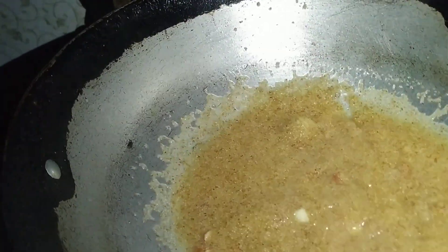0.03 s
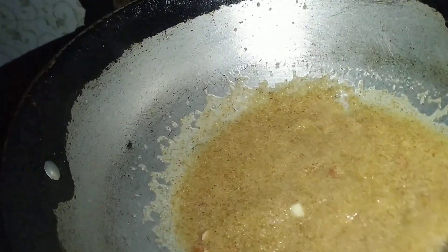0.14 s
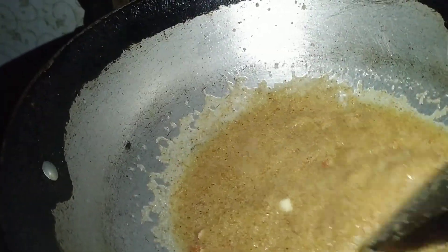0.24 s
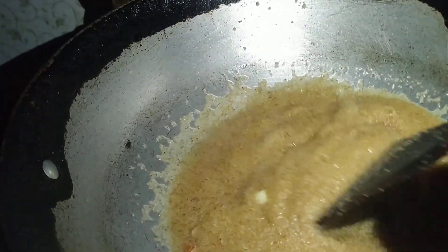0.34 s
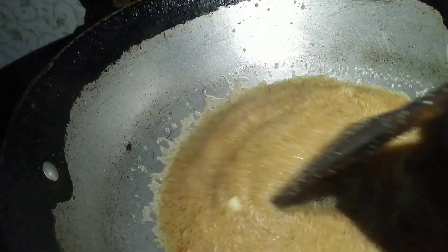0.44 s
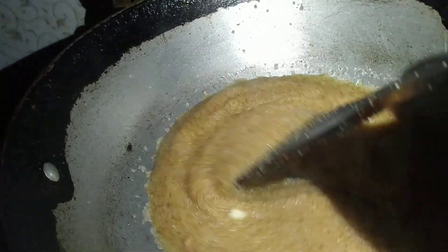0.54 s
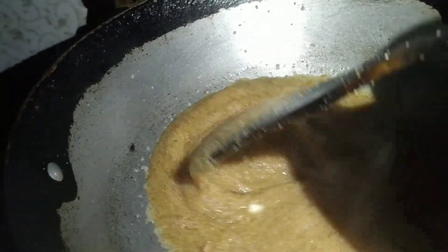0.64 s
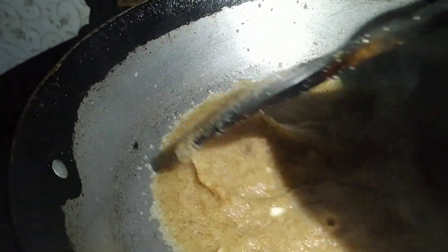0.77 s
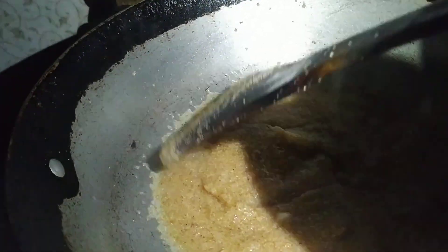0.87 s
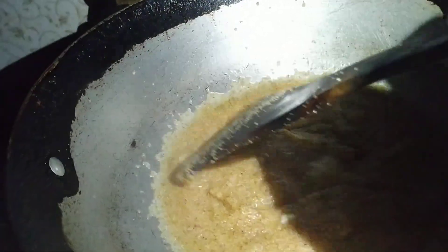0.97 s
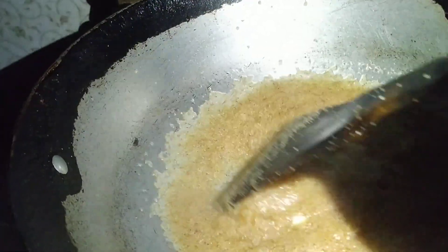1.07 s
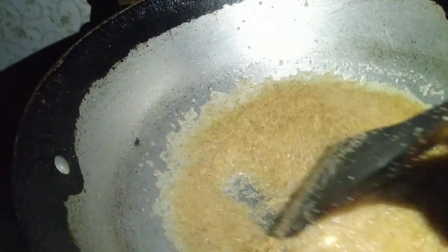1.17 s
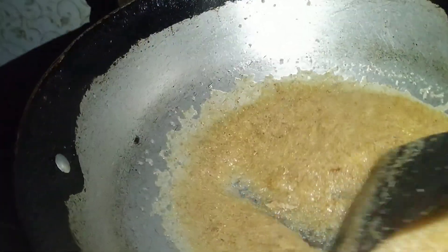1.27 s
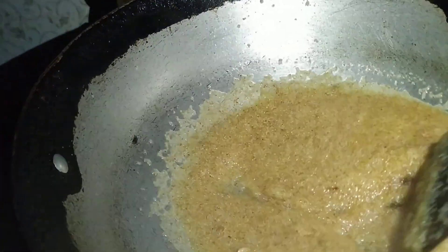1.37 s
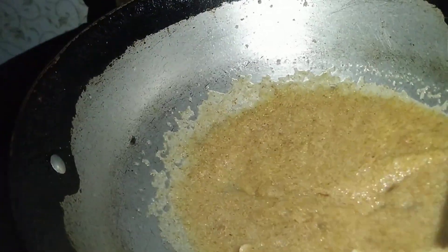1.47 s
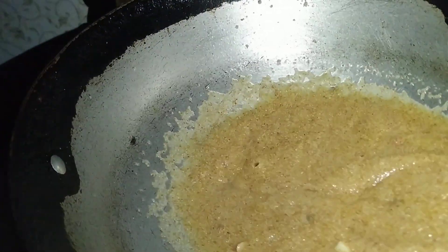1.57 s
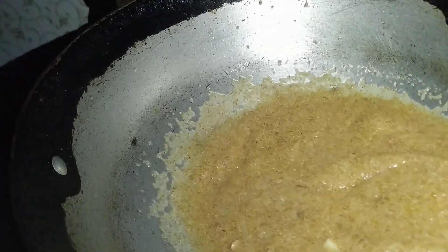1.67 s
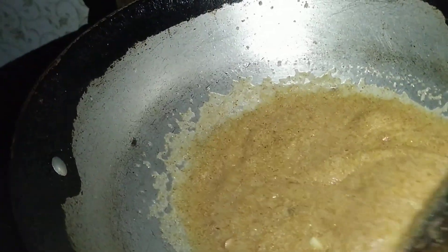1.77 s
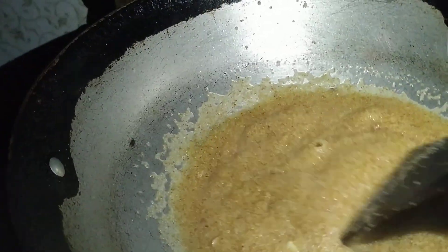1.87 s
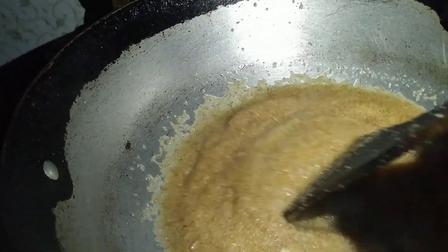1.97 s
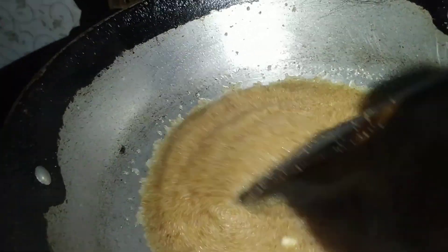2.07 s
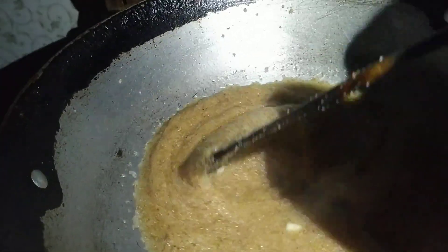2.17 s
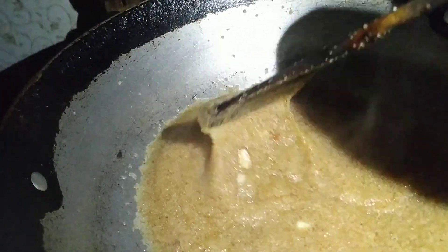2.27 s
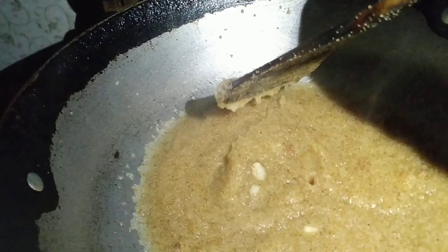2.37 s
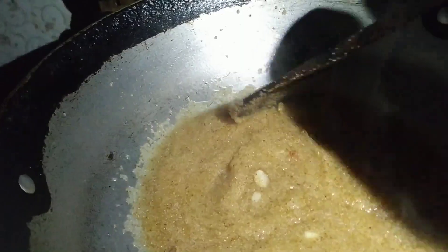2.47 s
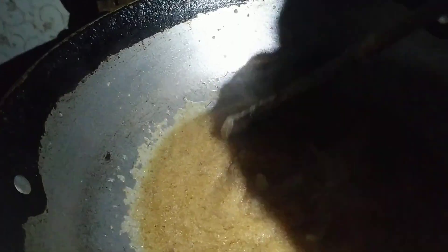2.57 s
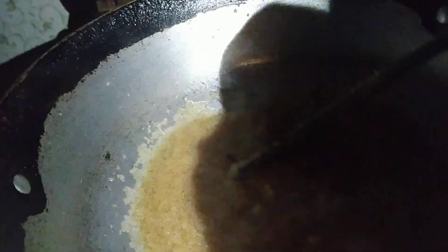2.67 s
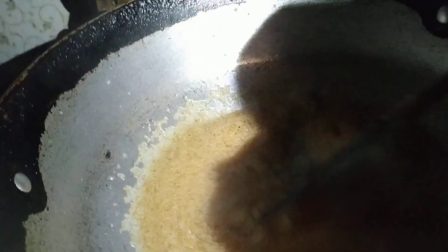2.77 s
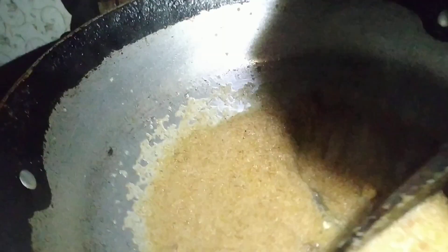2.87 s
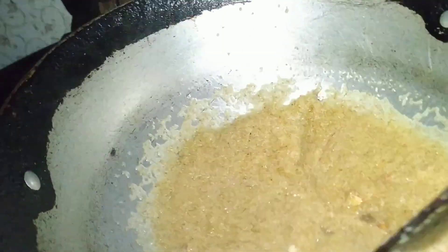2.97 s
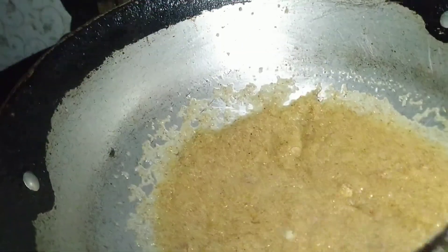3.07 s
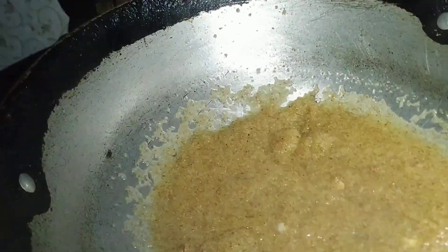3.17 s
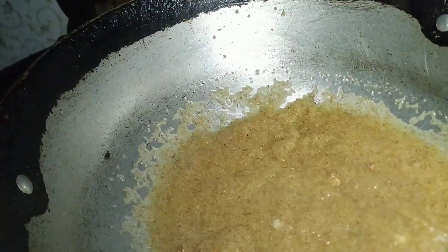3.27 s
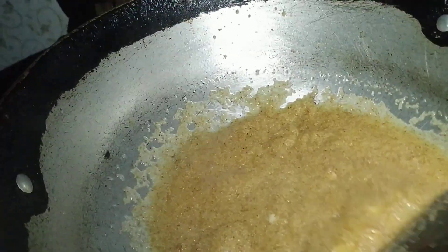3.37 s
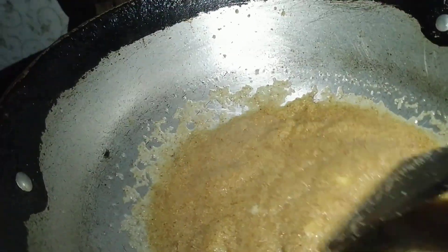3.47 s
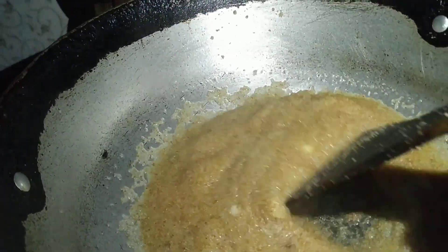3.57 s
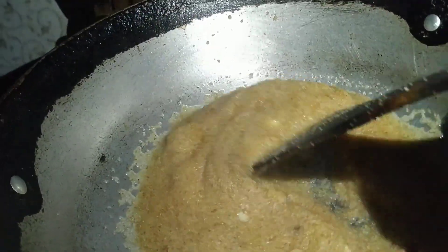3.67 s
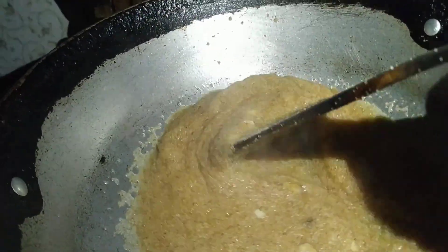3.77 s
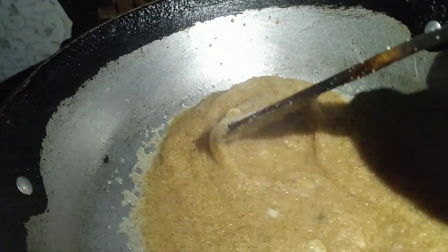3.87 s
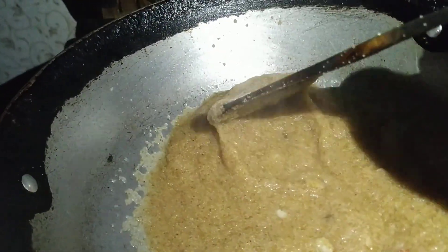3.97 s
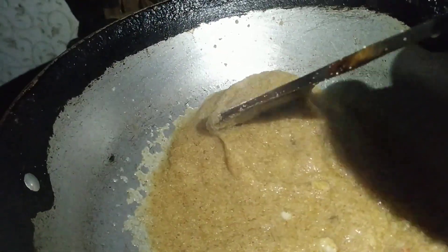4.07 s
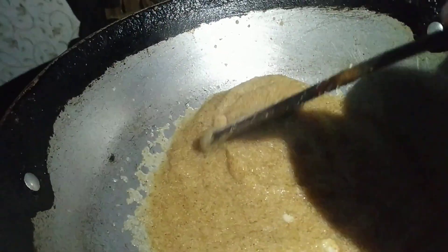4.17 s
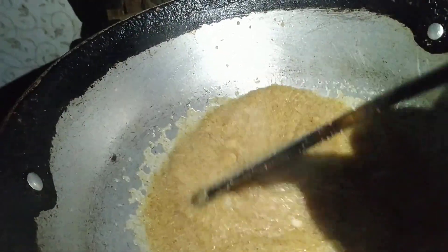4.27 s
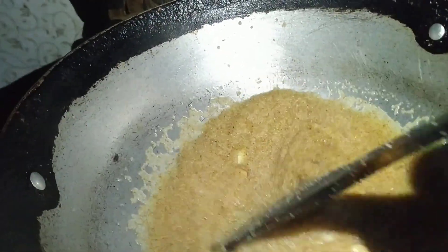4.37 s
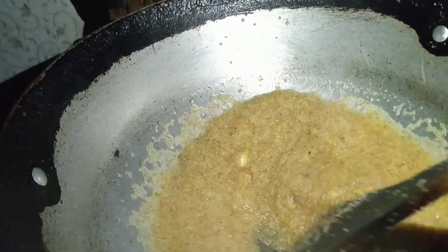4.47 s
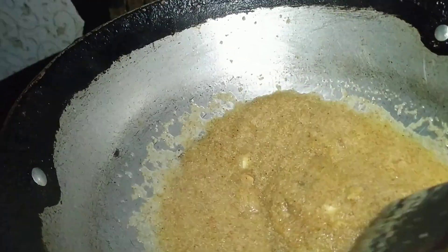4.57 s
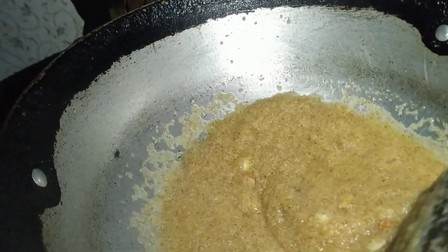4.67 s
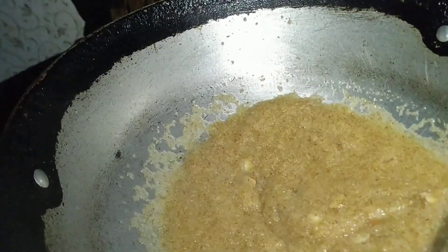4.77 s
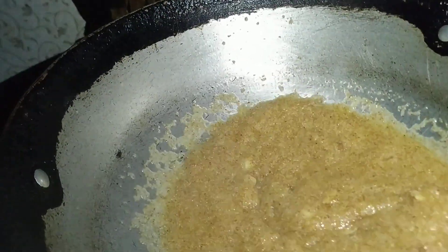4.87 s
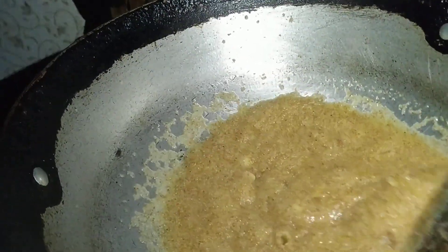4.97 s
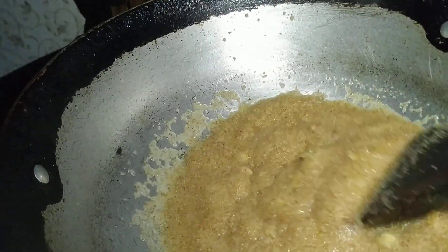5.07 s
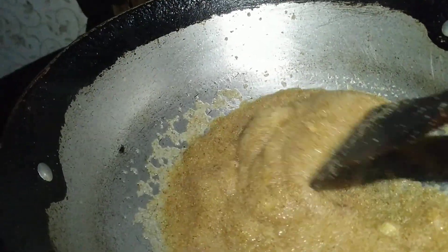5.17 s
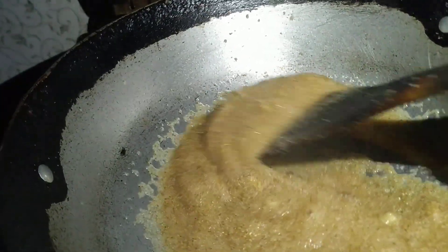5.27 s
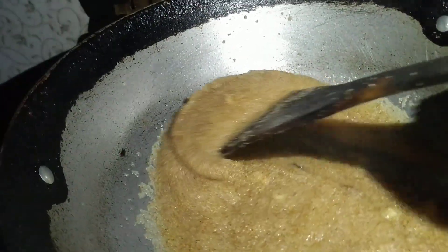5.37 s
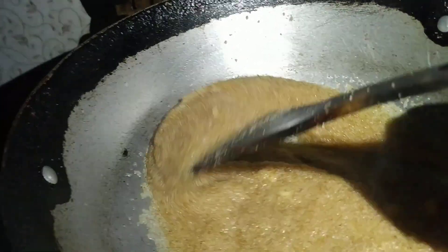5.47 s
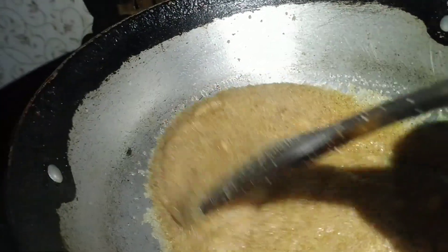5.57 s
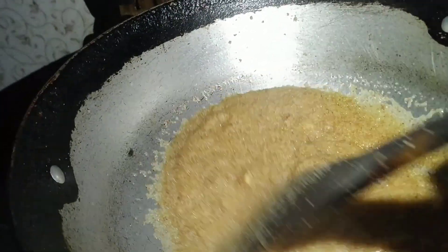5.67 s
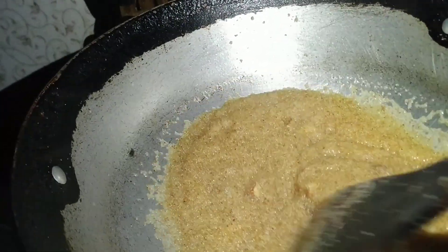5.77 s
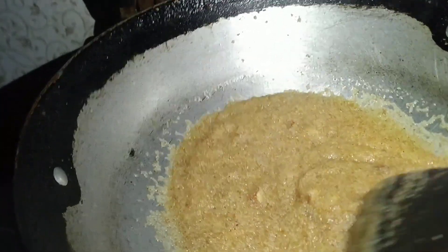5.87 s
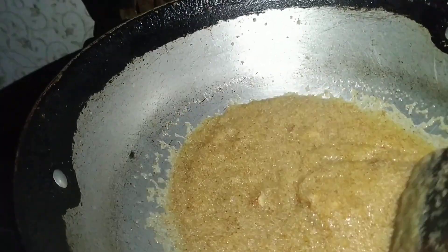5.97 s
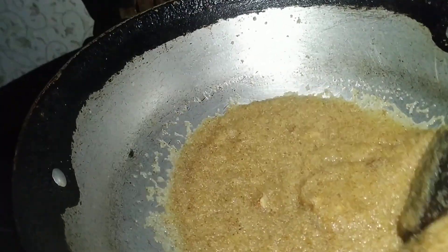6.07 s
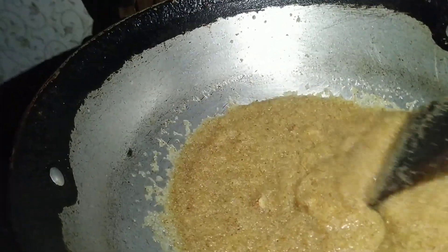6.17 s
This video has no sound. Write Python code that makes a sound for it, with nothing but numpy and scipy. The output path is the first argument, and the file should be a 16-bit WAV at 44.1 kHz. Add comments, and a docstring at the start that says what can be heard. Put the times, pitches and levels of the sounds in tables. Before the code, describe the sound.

Close-up stirring of thick pudding in a metal pan: muffled clonks, juddering scrapes, tiny wet spits, and a bump on the microphone midway.

```python
"""At a stove, a steel spatula stirs thick semolina pudding in a metal pan, close to a hand-held stereo
microphone. The blade knocks, judders, drags and rasps: clicks and grains drive the dull, short modes of the
loaded pan. The paste spits small ticks of filtered noise, bright cracks go with the bumps and a knock, a slow
motor throbs in low sines, and the hand sways and bumps the recorder. Its electronics add hiss and a buzz of
evenly spaced lines."""
import sys
import numpy as np
from scipy import signal
from scipy.io import wavfile
from scipy.ndimage import uniform_filter1d

SR = 44100
rng = np.random.default_rng(int(sys.argv[2]) if len(sys.argv) > 2 else 0)


def waveform_to_disk(signal):
    """Save audio, clipped to [-1, 1], as 16-bit WAV at the path in sys.argv[1]."""
    frames = np.transpose(np.atleast_2d(signal))
    scaled = np.clip(frames, -1, 1) * 32767
    samples = np.round(scaled).astype(np.int16)
    wavfile.write(sys.argv[1], SR, samples)


N = 274302

# how alike left and right are: (frequency [Hz], likeness [0 to 1])
LIKENESS = [(100, 0.77), (500, 0.97), (900, 0.25), (1300, 0.0), (16000, 0)]
# lean of the pan, positive to the left: (frequency [Hz], left-right difference [dB])
LEFT_LEAN = [(100, 5.5), (550, -2.5), (900, 3), (1800, 3.5), (3000, -1), (10000, 6)]
PLACES = 8   # spots on the pan, each with its own answer


def from_db(db):
    """Gain of a level in dB."""
    return 10 ** (np.asarray(db) / 20)


def rms_one(x):
    """Scale to unit rms."""
    return x / np.sqrt(np.mean(x ** 2) + 1e-20)


def filtered(x, order, hz, kind):
    """Butterworth filter."""
    return signal.sosfilt(signal.butter(order, hz, kind, fs=SR, output="sos"), x)


def in_time(rows):
    """Columns of a curve table at every sample."""
    s, *columns = np.transpose(rows)
    return [np.interp(np.arange(N) / SR, s, c) for c in columns]


def at_hz(points, hz):
    """Read a spectrum on a log-frequency axis."""
    points = np.array(points)
    return np.interp(np.log(hz), np.log(points[:, 0]), points[:, 1])


def lean(db):
    """Left and right gains for a left-right difference in dB."""
    return from_db(np.array([[db / 2], [-db / 2]]))


def drift(rate_hz):
    """Slow random wander of unit rms: noise smoothed by two poles at rate_hz, on every 40th sample."""
    r = np.exp(-80 * np.pi * rate_hz / SR)
    white = rng.standard_normal(N // 40 + 2002)
    slow = signal.lfilter([1], [1, -2 * r, r * r], white)[2000:]
    return np.interp(np.arange(N) / 40, np.arange(len(slow)), rms_one(slow))


def evened(x, seconds):
    """Hold the short-time level near 1."""
    power = uniform_filter1d(x ** 2, round(seconds * SR))
    return x / np.sqrt(power + 0.45 * np.mean(x ** 2))


def ring(x, hz, t60, phase=0):
    """A unit click sets a decaying sine of height 1 ringing from the given phase."""
    r, w = from_db(-60 / (t60 * SR)), 2 * np.pi * hz / SR
    start = [np.sin(phase), r * np.sin(w - phase)]
    return signal.lfilter(start, [1, -2 * r * np.cos(w), r * r], x + 1e-18)


def grains(per_s, spread_db):
    """Random clicks of uneven size and either sign; unit rms."""
    sizes = from_db(spread_db * np.minimum(rng.exponential(1, N), 3.5)) * rng.choice([-1, 1], N)
    return rms_one(sizes * (rng.random(N) < per_s / SR))


def coloured(x, low_db, upper_db, top_db):
    """Split into four ranges that sum to x, and weigh three of them against the middle."""
    # borders between low, middle, upper and top: ([Hz])
    range_edges_hz = [450, 1050, 2200]
    under = [filtered(x, 2, hz, "low") for hz in range_edges_hz]
    low, middle, upper, top = under[0], under[1] - under[0], under[2] - under[1], x - under[2]
    return from_db(low_db) * low + middle + from_db(upper_db) * upper + from_db(top_db) * top


def stereo_bands(size, spectrum, leaning, shape):
    """Third-octave bands of stereo noise, each with its level, likeness, lean and shape(hz) in time."""
    out, edges = 0, 56 * 2 ** (np.arange(26) / 3)
    white = rng.standard_normal((2, 2, size + SR // 10))   # with a run-in; neighbouring bands use different noise
    for k, (low, high) in enumerate(zip(edges, edges[1:])):
        mid, side = filtered(white[k % 2], 2, [low, high], "band")[:, -size:]
        hz = np.sqrt(low * high)
        alike = np.clip(at_hz(LIKENESS, hz), -1, 1)
        pair = np.sqrt(1 + alike) * mid + np.sqrt(1 - alike) * side * [[1], [-1]]
        out = out + from_db(at_hz(spectrum, hz)) * lean(at_hz(leaning, hz)) * shape(hz) * pair
    return out


def floor():
    """Room and circuit hiss: noise bands whose levels waver separately."""
    # relative colour of the hiss: (frequency [Hz], density [dB per Hz])
    hiss_spectrum = [(35, -30), (60, 7.5), (192, -13.5), (299, -0.5), (466, -16), (692, -8), (1560, -18),
                     (3370, -25.5), (5900, -22), (6630, -26), (15700, -19.5)]
    # lean of the hiss, positive to the left: (frequency [Hz], left-right difference [dB])
    hiss_lean = [(60, 0), (13000, 0), (15600, 8)]
    hiss = stereo_bands(N, hiss_spectrum, hiss_lean, lambda hz: from_db(1.6 * drift(9)))
    return from_db(-54.5) * rms_one(hiss)


def buzz():
    """Circuit whine: lines in step beat as a fast pulse train, each pulse with a spit of high hiss."""
    # strength of the lines before the lean: (frequency [Hz], level per line [dB rms])
    whine_spectrum = [(7400, -87), (11000, -84.5), (13000, -87), (15700, -79)]
    base_hz, first, step, last = 59.997, 125, 9, 260   # lines on every ninth multiple, one pulse per ninth of a turn
    paired_from, pair_db = 240, -4   # the top lines have a weaker neighbour one multiple below
    spit_db = -68   # before the lean
    turn = 2 * np.pi * base_hz * np.arange(N) / SR
    lines = 0
    for k in range(first, last + 1, step):
        below = from_db(pair_db) * np.cos((k - 1) * turn) * (k > paired_from)
        height = np.sqrt(2) * from_db(at_hz(whine_spectrum, k * base_hz))
        lines = lines + height * (np.cos(k * turn) + below)
    gate = (.5 + .5 * np.cos(step * turn)) ** 24
    spit = filtered(gate * rng.standard_normal(N), 2, 13500, "high")
    return (lines + from_db(spit_db) * rms_one(spit)) * from_db([[5], [-12]])   # stronger on the left


def throb():
    """Low orders of a slow motor, in step so that each turn is one dip; speed and strength wander."""
    # motor orders before they wander: (multiple of the turning rate, level [dB rms])
    orders = [(1, -71), (2, -53), (4, -63), (5, -69.5), (6, -66)]
    turning_hz = 24.3 * (1 + 0.00877 * drift(0.512))
    turn = 2 * np.pi * np.cumsum(turning_hz) / SR
    return sum(-np.sqrt(2) * from_db(db + 4.8 * drift(9.7)) * np.cos(k * turn) for k, db in orders)


def sway():
    """Very deep lumps from the hand that holds the recorder: narrow noise on a level curve."""
    # rumble of the held recorder: (time [s], level [dB])
    sway_curve = [(0.0, -52), (.6, -47), (.8, -60), (1.11, -49.5), (1.8, -47.5), (1.94, -25.5), (2.13, -44),
                  (2.2, -33.5), (2.56, -39), (2.87, -43), (2.95, -55), (3.3, -63), (3.45, -49), (3.7, -51),
                  (4.5, -63), (5.12, -44), (5.4, -47), (6.22, -45.5)]
    noise = filtered(rng.standard_normal(N + SR), 2, [12, 26], "band")[SR:]
    return from_db(in_time(sway_curve)[0]) * evened(noise, 0.21) * lean(-0.28)


def bumps():
    """The hand bumps the recorder: a short push in, a longer rebound, a slow settling, and a tick of the case."""
    # knocks on the recorder body:
    # (time [s], push level [dB], time scale [s], left-right difference [dB], case tick level [dB])
    bump_rows = [(2.533, -13.5, 0.0057, -7, -44.5), (2.6188, -10.5, 0.00096, -8, -44),
                 (2.6314, -19, 0.0024, -4, -49)]
    out = np.zeros((2, N))
    for s, push_db, width, lean_db, tick_db in bump_rows:
        i = round(s * SR)
        seconds = np.arange(SR // 10) / SR
        t = seconds / width   # in pulse widths
        hump = lambda start, length: np.sin(np.pi * np.clip((t - start) / length, 0, 1)) ** 2
        push = -hump(0, 0.91) + 0.78 * hump(0.13, 2.8) - 0.037 * hump(7.1, 1.1)
        crack = from_db(tick_db - 60 * seconds / 0.05) * rng.standard_normal((2, len(t)))
        out[:, i:i + len(t)] += from_db(push_db) * lean(lean_db) * push + crack
    return out


def ticks():
    """Short ticks: the paste spits, plus bright cracks with the bumps and a knock; each tick is a snap and a
    dying puff of noise over its own range."""
    # short ticks: the paste spits, plus bright cracks with the bumps and a knock: (time [s], peak [dB], lowest
    # frequency [Hz], highest frequency [Hz], t60 of the puff [s])
    tick_rows = [(.162, -44, 880, 1900, .01), (0.484, -41, 2010, 3100, 0.015),
                 (0.84, -34.5, 700, 1740, 0.014), (0.85, -43.5, 1970, 7350, 0.17),
                 (.935, -51, 2200, 3600, .03), (1.525, -39.5, 800, 1480, 0.0069),
                 (1.533, -49, 1900, 3840, 0.19), (1.597, -50, 2100, 3200, 0.014),
                 (1.701, -49, 3000, 5500, 0.011), (1.74, -34, 750, 1550, 0.016),
                 (2.177, -33.5, 4000, 9700, 0.0078), (2.617, -19.5, 1310, 6400, 0.012),
                 (2.631, -25, 1200, 5070, 0.0088), (2.928, -43, 900, 1690, 0.099),
                 (3.351, -48, 1100, 2130, 0.022), (3.397, -44, 900, 2000, 0.0072),
                 (4.092, -36.5, 700, 2540, 0.092), (4.105, -39.5, 1990, 6860, 0.047),
                 (4.118, -47, 1500, 5600, 0.13), (4.806, -47, 1500, 2900, .012),
                 (4.904, -50, 1700, 3000, 0.019), (4.929, -28, 700, 1450, 0.015),
                 (4.95, -44.5, 2800, 4970, 0.13), (5.081, -36.5, 3620, 6400, 0.016),
                 (5.335, -43, 1700, 3700, 0.0049), (5.351, -48, 1480, 3200, 0.19),
                 (5.372, -50, 1700, 3400, 0.01), (5.518, -53, 1800, 3370, .012)]
    out = np.zeros((2, N))
    t = np.arange(SR // 10) / SR
    for s, peak_db, low_hz, high_hz, t60 in tick_rows:
        i = round(s * SR)
        puff = from_db(-60 * t / max(t60, .003)) * rng.standard_normal((2, len(t)))
        puff[:, 0] += 6.0   # each tick snaps first
        puff = filtered(puff, 4, [low_hz, high_hz], "band")
        out[:, i:i + len(t)] += from_db(peak_db) * puff / abs(puff).max()
    return out


def rasp():
    """The bare edge on bare metal: dense fine slips, separate for left and right, ring the blade's resonances."""
    # scrapes of the bare edge: (time [s], length before the decay [s], level [dB])
    scrapes = [(0.182, 0.069, -54.5), (0.32, 0.025, -67), (0.963, 0.028, -46), (0.993, 0.034, -45.5),
               (1.036, 0.074, -61), (1.09, 0.027, -55), (1.753, 0.12, -56), (1.882, 0.014, -50),
               (2.552, 0.14, -58), (3.415, 0.016, -53.5), (3.566, 0.014, -55), (4.229, 0.045, -53),
               (5.021, 0.13, -57), (5.604, 0.035, -72), (6.12, 0.063, -58.5)]
    # resonances of the blade: (frequency [Hz], width [Hz], relative level [dB])
    edge_modes = [(1900, 420, -4), (2530, 270, 7), (3280, 160, -13), (4080, 230, 7), (4830, 340, 6.5),
                  (5600, 370, 7), (6040, 270, 4.5), (7020, 310, 4.5), (7930, 810, 2.5), (9040, 860, 1),
                  (11000, 1200, -6)]
    rise_s, t60_s, slips_per_s = 0.0025, 0.13, 2500
    t, level = np.arange(N) / SR, np.zeros(N)
    for s, length, db in scrapes:
        fall_db = 60 * np.clip(t - s - length, 0, 1) / t60_s
        level += from_db(db - fall_db) * np.clip((t - s) / rise_s, 0, 1)
    slips = np.array([grains(slips_per_s, spread_db=1.5) for _ in range(2)])
    slips = slips * from_db(1.9 * drift(36.0))
    rung = 0
    for hz, width, db in edge_modes:
        t60 = np.log(1000) / (np.pi * max(width, 120))
        rung = rung + from_db(db) * rms_one(ring(slips, hz, t60))
    return level * rms_one(rung)


def thud(force):
    """The stove passes on a dull thud of the contacts: the low part of the force, without ringing."""
    return from_db(-3.5) * filtered(force.sum(axis=0), 2, [45, 189], "band") * lean(-4.0)


def clonk(force):
    """The struck spot swings a few times at once, before the modes spread; the contact rounds the start."""
    # short, broad swings of the struck spot: (frequency [Hz], level [dB], t60 [s])
    swings = [(640, -17, 0.022), (1050, -21, 0.011), (1600, -31, 0.009)]
    t = np.arange(SR // 20) / SR
    swing = sum(-from_db(db) * lean(at_hz(LEFT_LEAN, hz)) * ring(t == 0, hz, t60) for hz, db, t60 in swings)
    rounding = 1 - np.exp(-(t / .0005) ** 2)
    return signal.fftconvolve(force[None], swing * rounding, axes=1)[:, :N]


def pan_response():
    """Stereo answer of one place on the pan to a click, unit energy: modes plus a dense wash dying by band."""
    # frequencies of the loaded pan's modes: ([Hz])
    mode_hz = [296, 332, 385, 427, 515, 555, 590, 640, 687, 745, 800, 880, 922, 1007, 1115, 1184, 1390,
               1480, 1575, 1660, 1870, 2050, 2320]
    # the same modes in order, before the early burst: (relative level [dB], t60 [s])
    mode_rows = [(3.5, 0.23), (-0.5, 0.25), (1.5, 0.18), (1, 0.17), (-0.5, 0.25), (11, 0.11), (1.5, 0.2),
                 (-6, 0.043), (1, 0.08), (1, 0.19), (5.5, 0.15), (9.5, 0.06), (1.5, 0.23), (-11, 0.042),
                 (4.5, 0.086), (2, 0.13), (-11.5, 0.1), (-6.5, 0.1), (-8, 0.13), (-12, 0.07), (-14.5, 0.16),
                 (-24, 0.068), (-4, 0.027)]
    # crowded modes and echoes, relative, before the early burst: (frequency [Hz], density [dB per Hz])
    dense_spectrum = [(150, 3), (250, -12.5), (300, 0), (400, -1), (600, 0.5), (950, 2.5), (1400, -18),
                      (1900, -11.5), (2600, -19.5), (4000, -24.5), (8000, -42.5), (15000, -46)]
    # how long the wash lasts: (frequency [Hz], t60 [s])
    dense_t60 = [(150, 0.85), (700, 0.27), (2000, 0.22), (8000, 0.033)]
    place_db = 3   # spread of the modes' strength by place
    dense_db = -3   # wash against modes
    early_db, early_t60_s = 4, 0.08   # first burst before the paste damps it
    spread_s = 0.004   # the modes take over this soon after the contact
    size = SR // 2
    t, click = np.arange(size) / SR, np.arange(size) == 0
    modes = np.zeros((2, size))
    chances = rng.standard_normal((len(mode_rows), 3))
    for hz, (level_db, t60), (strength, side, sign) in zip(mode_hz, mode_rows, chances):
        # higher modes reach the two ports out of step
        apart = np.sign(side) * np.arccos(np.clip(at_hz(LIKENESS, hz), -1, 1)) / 2
        pair = [ring(click, hz, t60, phase=p) for p in (-apart, apart)]
        modes += np.sign(sign) * from_db(level_db + place_db * strength) * lean(at_hz(LEFT_LEAN, hz)) * pair

    def decay(hz):
        """Dying away of one band, with equal energy for any length."""
        t60 = at_hz(dense_t60, hz)
        return from_db(-60 * t / t60) / np.sqrt(t60)

    dense = stereo_bands(size, dense_spectrum, LEFT_LEAN, decay)
    both = rms_one(modes) + from_db(dense_db) * rms_one(dense)
    both *= 1 + from_db(early_db - 60 * t / early_t60_s)
    both *= 1 - np.exp(-t / spread_s)
    both = filtered(both, 3, 230, "high")   # little radiates under the first mode
    return both / np.sqrt(np.sum(both ** 2) / 2)


def pan(force):
    """The force at each place rings that place's own response."""
    return sum(signal.fftconvolve(f[None], pan_response(), axes=1)[:, :N] for f in force)


def drag():
    """Fine slips that wander over the places; the furrow behind the blade favours a pitch that glides."""
    # steady drag through the paste, before colour and waver: (time [s], level [dB], favoured pitch [Hz])
    drag_curve = [(0.0, -48.5, 587), (.08, -42.5, 600), (.16, -63, 597), (.4, -41.5, 656), (.8, -55.5, 710),
                  (1.3, -53, 724), (1.42, -64, 536), (1.47, -51, 543), (1.55, -55.5, 624),
                  (1.63, -46.5, 696), (1.72, -52, 550), (2.0, -45, 600), (2.3, -46, 765), (2.5, -54.5, 606),
                  (2.7, -50, 560), (2.86, -76, 656), (3.0, -64, 600), (3.13, -51.5, 686), (3.65, -51, 584),
                  (3.95, -53, 604), (4.31, -58, 754), (4.6, -62, 720), (4.75, -56.5, 580), (4.82, -54, 666),
                  (4.91, -45.5, 670), (5.0, -54, 590), (5.08, -37, 560), (5.26, -57, 700),
                  (5.4, -55.5, 840), (5.67, -45, 720), (5.87, -58.5, 635), (5.97, -50.5, 617),
                  (6.06, -48, 575), (6.22, -53, 623)]
    slips_per_s, waver_db = 1000, 2
    upper_db = -3   # the paste muffles the upper ranges
    firm_db, thinning = -55.5, 0.49   # a drag lighter than firm_db loses body, dB per dB
    furrow_db, furrow_width_hz = -2, 130
    level_db, pitch_hz = in_time(drag_curve)
    bright_db = upper_db + thinning * (firm_db - level_db)
    slips = coloured(grains(slips_per_s, spread_db=1.5), 0, bright_db, bright_db)
    furrow, state = np.zeros(N), np.zeros(2)
    r = np.exp(-np.pi * furrow_width_hz / SR)
    b = [(1 - r * r) / 2, 0, (r * r - 1) / 2]
    for i in range(0, N, 256):   # the resonance is retuned block by block
        a = [1, -2 * r * np.cos(2 * np.pi * pitch_hz[i] / SR), r * r]
        furrow[i:i + 256], state = signal.lfilter(b, a, slips[i:i + 256], zi=state)
    travel = np.arange(N) / SR / .12   # one place further every .12 s
    away = [abs((travel - k + PLACES / 2) % PLACES - PLACES / 2) for k in range(PLACES)]
    share = np.clip(1 - np.array(away), 0, 1) ** .5
    return from_db(level_db + waver_db * drift(9.1)) * (slips + from_db(furrow_db) * furrow) * share


def blade():
    """Force at each place: a knock, then a judder of slips that swells and dies; the blade's angle sets the colour."""
    # blade meets pan, ranges against the middle one and before the trims below:
    # (time [s], knock [dB], judder [dB], low range [dB], upper range [dB], top range [dB])
    contacts = [(.097, -18, -61, 12.5, 0, 5), (.187, -6.5, -28, 4.5, 1.5, -2),
                (.216, 2.5, -29.5, -5, -3, 3), (.234, 1, -37, 3, -9, -8), (.264, -7, -39.5, 4, 3, -5),
                (.321, -4.5, -36.5, 5.5, 6, 8), (.343, -8, -40, 4, 6.5, 4), (.42, -6, -38, 6.5, 5, 4),
                (.509, -17, -50, 6.5, 11.5, 6), (.628, 6, -30, 0.5, 8, 3), (.889, -9, -39.5, -3, 4.5, -2),
                (.966, -12, -30.5, 14.5, 9.5, 8), (.993, -2, -37.5, 8, 9, 14), (1.007, 0, -31, 8, 7, 3),
                (1.031, -6, -40, 10, 4, 7), (1.076, -5.5, -29.5, 9, 3, 7.5), (1.1, -3, -34, 8, 8.5, -1),
                (1.13, -2.5, -41, -4, -4, 3), (1.163, -22, -43, 7.5, 8.5, 1),
                (1.668, -10, -41.5, -27, -23, -6), (1.755, -5, -24, 2.5, -5, -3.5),
                (1.782, -4, -33, 7.5, 3, 5), (1.83, -14, -37.5, 10.5, 0, -4),
                (1.89, -3.5, -54, 2, 7.5, 8.5), (1.914, -4.5, -36.5, 10, 2, 4),
                (1.987, -1.5, -33, 1, -1.5, -3), (2.074, -21, -45, 7, 12.5, 14),
                (2.1768, 8, -31, 0, 8, -0.5), (2.478, -10.5, -39, 0, 1.5, 0),
                (2.562, -11.5, -24, 10.5, 0, 4.5), (2.577, -7, -28, -1, 2, 8.5), (2.6, -9.5, -31, 9, 9, 6),
                (2.619, 0, -37, 9.5, 3, 9), (2.633, -9.5, -40, 12.5, 0, -8), (2.645, -11, -41, 1, -9, -8),
                (2.681, -7.5, -36, 3, -1, 2), (2.699, -6, -52, 4.5, 3, 2.5),
                (2.729, -8.5, -37.5, 0, 5, -13), (2.759, -13, -61, -3, 3, -7),
                (2.779, -17, -55, -2, -8, -7), (2.797, -16, -50, 5, -12, -10),
                (2.912, -22, -58, 10.5, 4, -10), (3.062, -21, -43, -23, -17, -8),
                (3.108, -17, -63, -17, -24, 0), (3.215, -26, -43, -18, -20, -12),
                (3.285, -14, -56, -21, -25, -5), (3.328, -9.5, -40.5, -28, -17, -4),
                (3.42, -1.5, -23.5, 5, -1, 0.5), (3.449, -25, -32, 10, 1.5, -17),
                (3.519, -10.5, -66, -14, 0, -6), (3.568, -1.5, -27.5, 3, 3, 3.5),
                (3.61, -11, -36, 7.5, 1, -7), (3.679, -11.5, -41, -19, 4, -2),
                (3.692, -2, -36, 3, -1.5, -2.5), (3.783, -11.5, -36.5, -11, 7, 2),
                (3.809, 3.5, -27, -2.5, -2, -3), (3.852, -5, -43, 4, -4.5, -7),
                (4.148, -7, -37.5, -26, -1, -23), (4.234, -10, -30, 9, 3.5, 7.5),
                (4.246, -2, -37, 2, -3, 7), (4.259, -2.5, -34.5, 9, 10.5, 1), (4.269, -6, -33, 5, 7, 6.5),
                (4.29, -8, -29.5, 7.5, 3, -3), (4.313, -4, -34.5, 7.5, 8.5, 6),
                (4.345, -26, -34, 2, -4, -7), (4.364, -6.5, -42.5, -1, 5.5, 2.5),
                (4.64, -17.5, -47, 4, -15, -6), (4.945, -5, -38.5, -13, -5, 1.5),
                (5.027, -11.5, -31.5, 12.5, 8.5, 6), (5.059, -9, -30, 11, 8, 10.5),
                (5.083, -3.5, -30.5, 1.5, 8, 5), (5.106, -10, -28.5, 3.5, 2, 0),
                (5.133, -12, -27.5, -3, 1, -6), (5.147, -8, -31, -3, -0.5, 0.5), (5.19, -11, -61, 0, -5, 0),
                (5.217, -16, -59, -3, 5, 5), (5.235, -20.5, -63, -5, 8, -4),
                (5.496, -12, -43, -11, -6.5, -9), (5.604, -9, -31, 9.5, 1.5, 6.5),
                (5.625, -4, -33, 8, 8.5, 6.5), (5.708, -11, -39.5, 12, 6, 1.5),
                (5.753, -13, -42.5, 15.5, 12.5, 8), (6.035, -8.5, -41.5, -23, -18, -9),
                (6.139, -8, -30, 13, 3, 3.5), (6.164, -4, -29.5, -10, 1.5, -7),
                (6.183, -2, -33, -20, 6, 10)]
    slips_per_s = 330
    hold_s, rise_s, t60_s = 0.015, 0.011, 0.16   # slips swell fast, hold, and die as the blade slows
    judder_top_db, knock_upper_db, knock_top_db = -2.5, -3, -4   # trims of the ranges
    force = np.zeros((2, PLACES, N + SR))
    slips = np.tile(evened(grains(slips_per_s, spread_db=2.5), 0.033), 2)
    t = np.arange(SR // 3) / SR
    shape = from_db(-60 * np.maximum(t - hold_s, 0) / t60_s) * (1 - np.exp(-t / rise_s))
    for k, (s, knock_db, judder_db, low_db, upper_db, top_db) in enumerate(contacts):
        i = round(s * SR)
        judder = from_db(judder_db) * shape * slips[i:i + len(t)]
        judder = coloured(judder, low_db, upper_db, top_db + judder_top_db)
        knock = from_db(knock_db) * (t == 0)
        knock = coloured(knock, low_db, upper_db + knock_upper_db, top_db + knock_top_db)
        force[:, k % PLACES, i:i + len(t)] += [knock, judder]
    return force[..., :N]


def scene():
    """Floor, motor, hand, paste, and the blade's forces heard through pan and stove."""
    knocks, judders = blade()
    slips = judders + drag()
    force = knocks + slips
    struck = (knocks + from_db(-8.5) * slips).sum(axis=0)   # slips swing the spot less than knocks
    background = floor() + buzz() + throb() + sway() + bumps()
    return background + ticks() + rasp() + thud(force) + clonk(struck) + pan(force)


def record(dry):
    """A steep low-pass cuts the top above 15730 Hz."""
    return signal.sosfilt(signal.ellip(16, .3, 90, 15730, fs=SR, output="sos"), dry)


dry = scene()
out = record(dry)
waveform_to_disk(out)
```